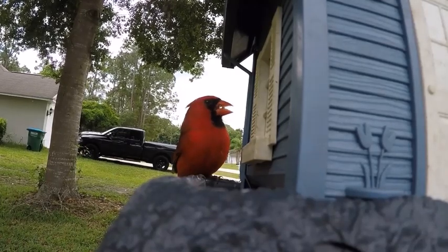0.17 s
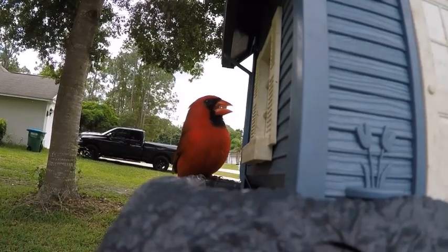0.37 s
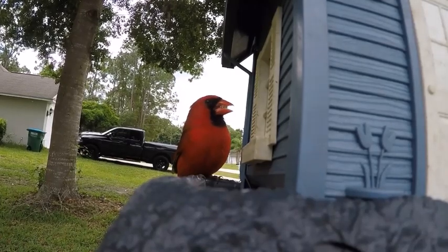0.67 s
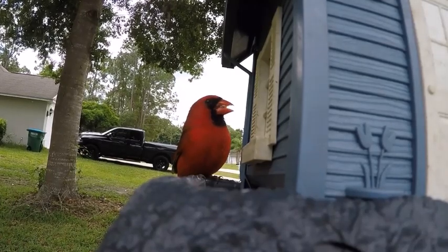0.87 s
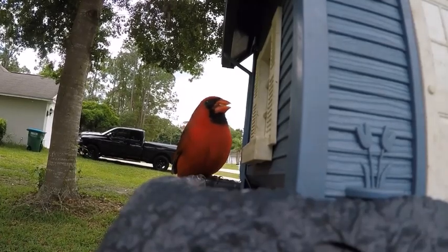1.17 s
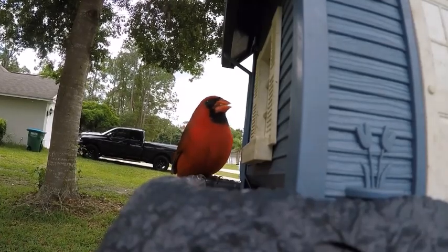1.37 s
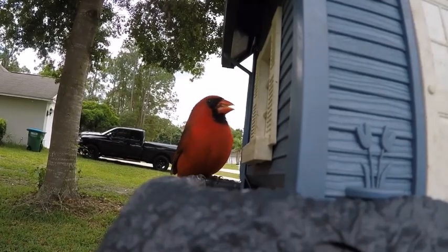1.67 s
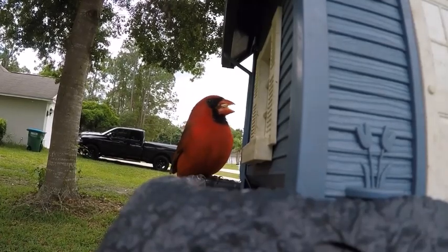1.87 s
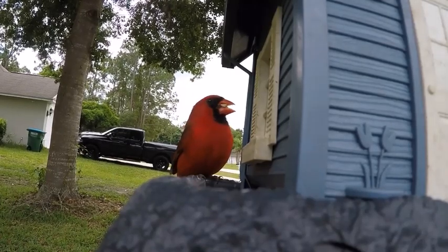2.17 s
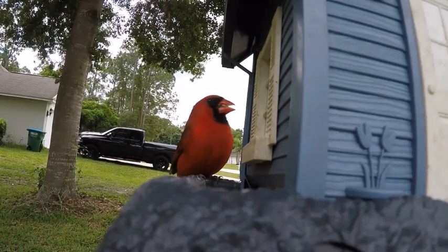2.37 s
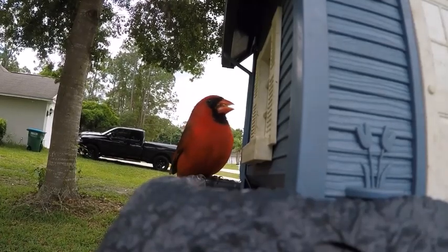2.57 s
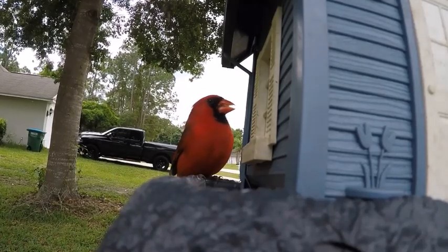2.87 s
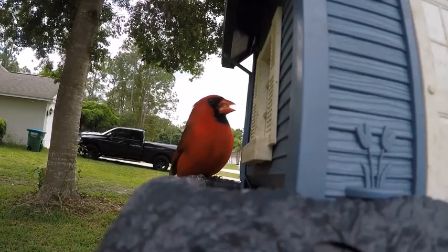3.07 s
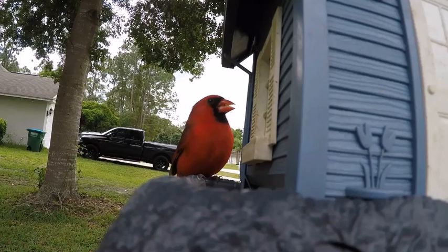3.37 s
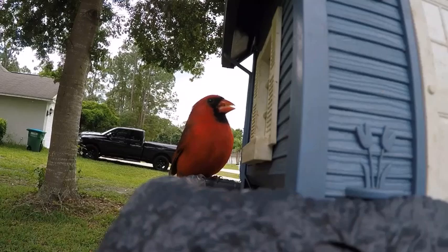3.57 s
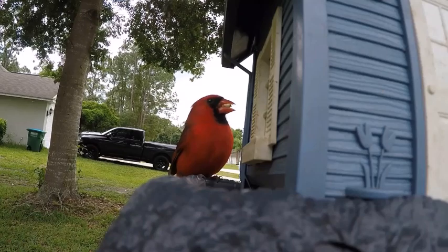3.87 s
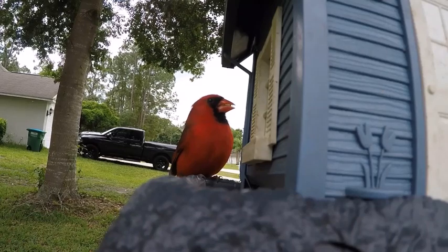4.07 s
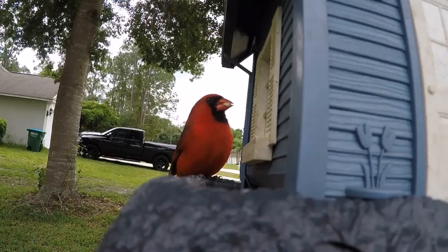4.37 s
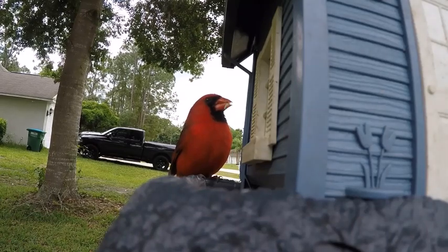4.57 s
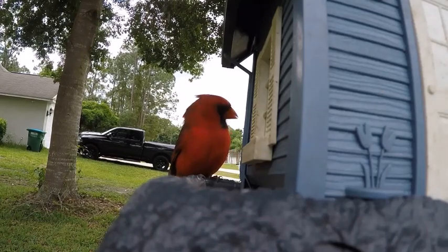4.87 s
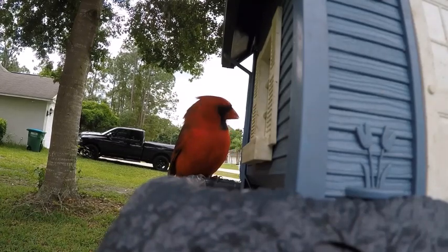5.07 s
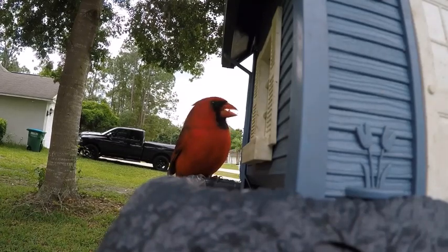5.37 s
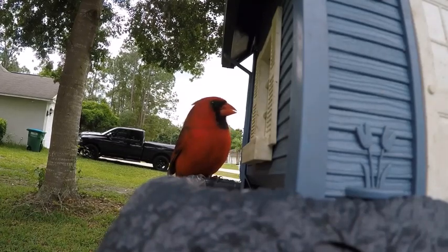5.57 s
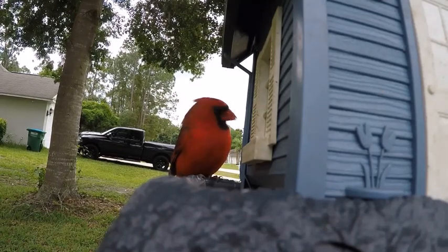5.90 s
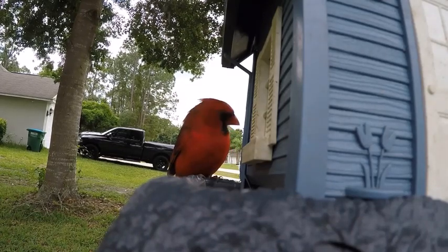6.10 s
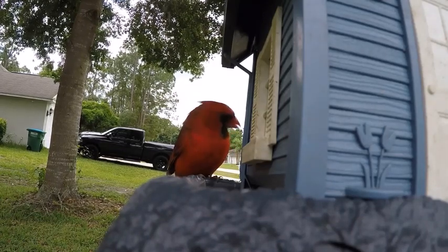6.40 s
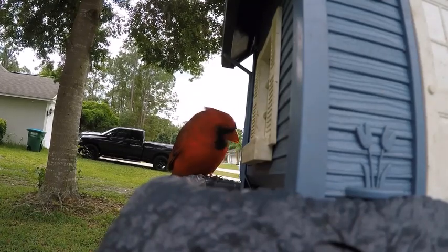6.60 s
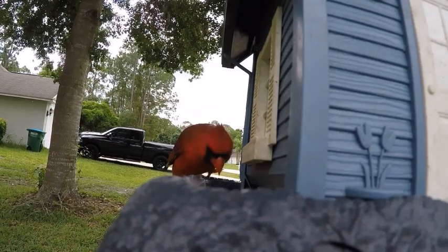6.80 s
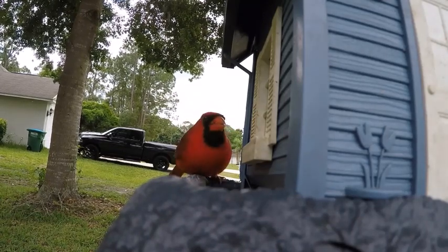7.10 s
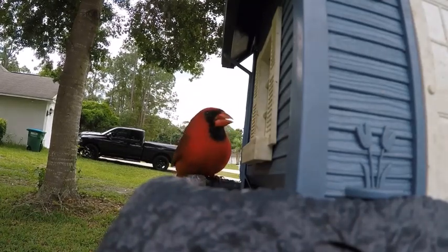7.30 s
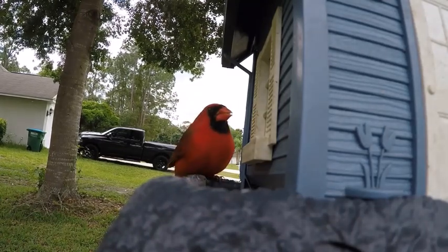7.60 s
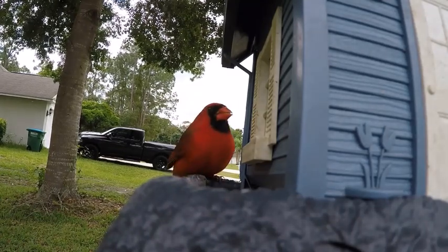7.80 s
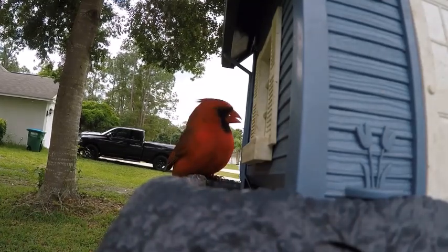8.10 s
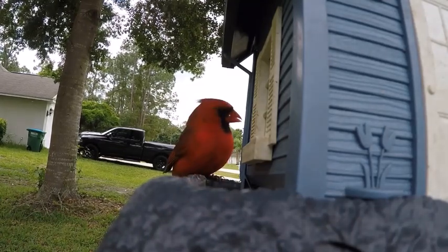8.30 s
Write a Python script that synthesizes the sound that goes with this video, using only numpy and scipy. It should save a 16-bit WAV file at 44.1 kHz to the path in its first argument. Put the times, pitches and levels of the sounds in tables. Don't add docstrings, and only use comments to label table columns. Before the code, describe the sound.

Deep wind buffets thump a small outdoor microphone while distant birds whistle in echoing runs and a seed cracks sharply close by.

```python
import sys
import numpy as np
from scipy import signal
from scipy.fft import rfft, irfft
from scipy.io import wavfile
from scipy.ndimage import uniform_filter1d

SR = 44100
rng = np.random.default_rng(int(sys.argv[2]) if len(sys.argv) > 2 else 0)


def master(y):
    cut = np.clip(np.atleast_2d(y).T, -1, 1)
    pcm = np.round(cut * 32767)
    wavfile.write(sys.argv[1], SR, pcm.astype(np.int16))


def ratio(d):
    e = np.asarray(d, float) / 20
    return 10 ** e


N = 372644


def coloured(points):
    hz, db = np.transpose(points)
    bins = np.maximum(np.fft.rfftfreq(N, 1 / SR), 1)
    gain = ratio(np.interp(np.log(bins), np.log(hz), db, -120, -120))
    noise = irfft(rfft(rng.standard_normal(N)) * gain, N)
    return noise / noise.std()


def walk(rate_hz, size=N):
    hold = int(SR / rate_hz)
    steps = np.repeat(rng.standard_normal(size // hold + 1), hold)
    return 1.49 * uniform_filter1d(uniform_filter1d(steps, hold), hold)[:size]


def add(out, sound, at_s):
    start = int(round(at_s * SR))
    sound = sound[max(-start, 0):max(N - start, 0)]
    first = max(start, 0)
    out[first:first + len(sound)] += sound


# frequency in Hz, level in dB per Hz.
BUFFET_SPECTRUM = [(9, -15), (16, 0.5), (27, 3), (40, -1), (60, -9), (90, -22.5), (130, -44)]
# frequency in Hz, level in dB per Hz.
FLUTTER_SPECTRUM = [(45, -37), (70, 3.5), (110, -1.5), (160, -11), (240, -22), (400, -34.5)]
# time in seconds, buffet level in dB, flutter level in dB.
BREEZE = [(0, -35, -40), (.45, -37, -37), (.9, -41.5, -42.5), (1.2, -49.5, -47), (1.7, -44.5, -44.5),
          (2.15, -52, -50.5), (2.5, -41.5, -47), (3, -40.5, -45.5), (3.7, -38.5, -44.5), (4.2, -40, -44),
          (4.9, -43, -46.5), (5.5, -48, -49), (6, -36, -44.5), (6.6, -46.5, -48.5), (7.2, -43.5, -49.5),
          (7.7, -46, -47), (8.45, -36, -47)]
# time of the peak in seconds, peak in dB, half length in seconds.
GUSTS = [(-0.008, -17, 0.11), (0.131, -24, 0.037), (0.31, -24, 0.048), (0.71, -34.5, 0.069),
         (0.894, -35, 0.075), (2.291, -35, .05), (2.523, -42.5, 0.063), (2.71, -43.5, 0.055),
         (3.133, -39, 0.13), (3.457, -35, 0.092), (3.588, -32, 0.041), (3.709, -25.5, 0.031),
         (3.774, -19, 0.06), (3.947, -27, 0.08), (4.26, -32, 0.06), (4.417, -37, 0.061),
         (4.82, -37.5, 0.042), (4.996, -26, 0.066), (5.28, -25.5, 0.085), (5.422, -24, 0.046),
         (5.522, -20.5, 0.1), (6.21, -32.5, 0.1), (6.76, -29, .1), (7.068, -33.5, 0.15), (7.352, -30, .06),
         (7.634, -23.5, 0.13), (7.865, -30, 0.065), (7.98, -32.5, .04), (8.132, -26.5, 0.075),
         (8.255, -27, 0.055)]


def wind():
    fall_db, gust_flutter_db = 17, -22
    t = np.arange(N) / SR
    s, buffet_db, flutter_db = np.transpose(BREEZE)
    gust = sum(ratio(db - fall_db * np.abs((t - at) / half) ** 1.14) for at, db, half in GUSTS)
    buffet = coloured(BUFFET_SPECTRUM)
    buffet /= uniform_filter1d(buffet ** 2, size=2600) ** 0.37
    buffet *= np.clip(.3 + t / .015, 0, 1)
    buffet_level = ratio(np.interp(t, s, buffet_db)) + gust
    flutter_level = ratio(np.interp(t, s, flutter_db)) + ratio(gust_flutter_db) * gust
    return buffet_level * buffet / buffet.std() + flutter_level * coloured(FLUTTER_SPECTRUM)


def yard(hz, t60_s, wash_db):
    leaf_t60_s, leaf_db = .11, -3
    wall_s, wall_db = .102, -13
    t = np.arange(SR) / SR
    blur = rng.standard_normal(SR) * 1000 ** (-t / leaf_t60_s)
    blur /= np.linalg.norm(blur)
    decay = 1000 ** (-t / (t60_s * 2500 / hz))
    lumps = ratio(1.9 * walk(60, size=SR))
    wash = rng.standard_normal(SR) * lumps * decay * np.clip(t / 0.017, 0, 1)
    path = ratio(leaf_db) * blur + ratio(wash_db) * wash / np.linalg.norm(wash)
    add(path, ratio(wall_db) * blur[:SR // 20], wall_s)
    path[0] = 1
    return path


def bird(calls, shape, t60_s, wash_db, flicker_db=2.0):
    out = np.zeros(N)
    for s, percent, *peaks in calls:
        for note, peak_db in zip(shape, peaks):
            at, hz, note_db = np.transpose(note)
            t = np.arange(at[0], at[-1], 1 / SR)
            glide = uniform_filter1d(np.interp(t, at, hz), size=90, mode="nearest")
            glide *= 1 + percent / 100
            flicker = walk(130, size=len(t))
            flicker -= flicker.mean()
            level = ratio(peak_db + np.interp(t, at, note_db) + flicker_db * flicker)
            tone = level * np.sin(2 * np.pi * np.cumsum(glide) / SR)
            heard = signal.fftconvolve(tone, yard(glide.mean(), t60_s, wash_db))
            add(out, heard, s + at[0])
    return out


# seconds from the start of the call, pitch in Hz, level in dB.
ROLL_NOTES = [
    [(-.006, 5300, -34), (.008, 4850, -15), (.03, 4350, -1), (.045, 4100, -5), (.057, 3870, -3),
     (.066, 3500, -8), (.074, 3150, -9), (.09, 2780, -18), (.094, 2750, -30)],
    [(.096, 2750, -22), (.108, 2950, -10), (.119, 3150, 0), (.126, 3200, -25)],
    [(.128, 3750, -22), (.14, 4000, -9), (.149, 4450, 0), (.157, 4900, -4), (.162, 5150, -25)],
    [(.2, 2420, -22), (.214, 2540, -3), (.232, 2620, 0), (.248, 2590, -4), (.254, 2450, -10),
     (.264, 2260, -13), (.27, 2150, -30)],
]
# start in seconds, then peaks in dB of the fall, hook, rise and low note.
ROLL_CALLS = [
    (-.17, -46, -45.5, -49, -58.5),
    (.176, -46, -51, -45.5, -55.5),
    (0.525, -49, -52.5, -46, -56),
    (5.677, -55, -53, -52.5, -57.5),
    (6.013, -51, -48.5, -51.5, -54),
    (6.344, -50.5, -47.5, -51.5, -56),
    (6.68, -48, -46.5, -51, -53.5),
    (7.031, -50, -49, -48.5, -52.5),
]


def rolling_songs():
    calls = [(s, 0, *peaks) for s, *peaks in ROLL_CALLS]
    return bird(calls, ROLL_NOTES, t60_s=1.2, wash_db=-2.5, flicker_db=3.5)


# seconds from the start of the call, pitch in Hz, level in dB.
OPENER_NOTE = [
    [(.012, 2640, -24), (.024, 2720, 0.5), (.045, 2860, 1), (.065, 2926, 1), (.095, 2910, 4.5),
     (.11, 2800, -21)],
]
# start in seconds, pitch shift in percent, peak in dB.
OPENER_CALLS = [
    (1.238, 0.19, -56),
]
# seconds from the start of the call, pitch in Hz, level in dB.
ARCH_NOTE = [
    [(-.006, 2380, -14), (.004, 2480, -4), (.022, 2720, -2), (.042, 2890, -2), (.065, 2945, 0),
     (.092, 2950, 2), (.106, 2800, -1), (.12, 2520, -3), (.126, 2420, -20)],
]
# start in seconds, pitch shift in percent, peak in dB.
ARCH_CALLS = [
    (1.484, -0.69, -55.5),
    (1.738, 0.12, -55.5),
    (1.996, 0.29, -53.5),
    (2.256, 0.065, -53.5),
    (4.645, -0.63, -57),
    (4.895, -0.57, -54),
    (7.504, .6, -55.5),
    (7.755, 0.0092, -55),
    (8.001, 0.11, -55.5),
    (8.257, 0.25, -53.5),
]


def arched_whistles():
    opener = bird(OPENER_CALLS, OPENER_NOTE, t60_s=1.31, wash_db=-0.18)
    return opener + bird(ARCH_CALLS, ARCH_NOTE, t60_s=1.31, wash_db=-0.18)


# seconds from the start of the call, pitch in Hz, level in dB.
CHIP_NOTE = [
    [(-.001, 5800, -16), (.002, 6500, -3), (.005, 7250, -3), (.009, 7600, 0), (.014, 7750, -4),
     (.019, 7780, -28)],
]
# start in seconds, pitch shift in percent, peak in dB.
CHIP_CALLS = [
    (1.414, 1.5, -50),
    (3.222, 2, -48.5),
    (4.879, -1.8, -53),
    (6.916, -3, -53),
    (8.226, -1.5, -52.5),
]


def chips():
    return bird(CHIP_CALLS, CHIP_NOTE, t60_s=0.88, wash_db=0.73)


def ring(modes, pitch):
    t = pitch * np.arange(SR // 10) / SR
    sound = sum(ratio(db) * 1000 ** (-t / t60) * np.sin(2 * np.pi * hz * t) for hz, db, t60 in modes)
    return sound / np.abs(sound).max()


# frequency in Hz, level in dB, T60 in seconds.
HUSK_MODES = [(1900, -6, .003), (2900, -5, .003), (4100, -6, .003), (4900, 1, .008), (6200, -2, .003),
              (8500, -4, .003)]
# frequency in Hz, level in dB, T60 in seconds.
SHELL_MODES = [(11300, -4, .003), (12300, -2, .003), (13100, 0, .004), (14100, -13, .003)]
# start in seconds, shell level in dB, husk level in dB,
# after-crackle level in dB, husk pitch as a factor.
CRACKS = [
    (1.4044, -52, -44.5, -8, 1.2),
    (2.2846, -44.5, -49, -6, 1.2),
    (3.5857, -25, -31.5, -17, 1),
    (4.0587, -77, -52, -3, 1.3),
    (6.796, -74, -44, -12, .63),
    (6.872, -82, -42, -14, .1),
]


def cracks():
    out = np.zeros(N)
    t = np.arange(SR // 40) / SR
    for s, shell_db, husk_db, tear_db, pitch in CRACKS:
        fibres = rng.standard_normal(len(t)) * (rng.random(len(t)) < .15)
        push = fibres * np.exp(-t / 0.0067) * (t > .0035) * ratio(tear_db)
        push[[0, 14]] = .3, 1
        body = ratio(shell_db) * ring(SHELL_MODES, 0.98) + ratio(husk_db) * ring(HUSK_MODES, pitch)
        add(out, signal.fftconvolve(push, body), s)
    return out


# time in seconds, firing rate in Hz, level in dB.
ENGINE = [(1.801, 36, -64), (2.0, 36, -49.5), (2.3, 34.24, -46), (2.701, 32.35, -46.5), (3.0, 31.8, -51.5),
          (3.2, 31.9, -73)]
# multiple of the firing rate, level in dB.
ENGINE_ORDERS = [(3, -0.5), (4, -3), (5, -14)]


def engine():
    s, hz, db = np.transpose(ENGINE)
    t = np.arange(N) / SR
    turn = 2 * np.pi * np.cumsum(np.interp(t, s, hz)) / SR
    orders = sum(ratio(order_db + 2.26 * walk(4.75)) * np.sin(k * turn) for k, order_db in ENGINE_ORDERS)
    return ratio(np.interp(t, s, db, -120, -120)) * orders


# frequency in Hz, level in dB per Hz.
TRAFFIC_SPECTRUM = [(100, -21), (170, -6), (303, -6), (429, -2.5), (506, -3.5), (546, -7.5), (595, -9.5),
                    (701, -12.5), (1220, -21), (2300, -26), (2990, -50), (5060, -120)]
# frequency in Hz, level in dB per Hz.
HISS_SPECTRUM = [(1180, -33), (2000, -7), (2410, -1.5), (2640, 3), (3130, -1), (4210, -1.5), (4940, -1),
                 (5570, -4), (6590, -6), (7170, -8), (8640, -9.5), (10200, -13), (13100, -10),
                 (14100, -9.5), (15100, -18)]
# frequency in Hz, width in Hz, level in dB rms.
HISS_PEAKS = [(9580, 150, -88.5), (14440, 230, -81.5)]
# frequency in Hz, level in dB rms.
WHINE = [(8631, -92.5), (14086, -87)]
# time in seconds, gain in dB.
DRIFT = [(0, 1.65), (1.4, 1.6), (2.8, 0.4), (4.2, -0.1), (5.6, 0.8), (7, 0.6), (8.45, 0.3)]


def background():
    t = np.arange(N) / SR
    traffic = ratio(-57 + 0.74 * walk(2.6)) * coloured(TRAFFIC_SPECTRUM)
    hiss = ratio(-66.5 + 0.36 * walk(3)) * coloured(HISS_SPECTRUM)
    for hz, width, db in HISS_PEAKS:
        hiss += ratio(db) * coloured([(hz - width, -14), (hz, 0), (hz + width, -14)])
    whine = sum(np.sqrt(2) * ratio(db) * np.sin(2 * np.pi * hz * t) for hz, db in WHINE)
    return (traffic + hiss) * ratio(np.interp(t, *np.transpose(DRIFT))) + whine


def scene():
    birds = rolling_songs() + arched_whistles() + chips()
    return (wind() + birds + cracks() + engine() + background())[None]


# middle of the first frame in seconds, length in frames,
# frequency in Hz
STARVED = [(.128, 1, 1200), (.597, 1, 600), (.661, 1, 600), (.853, 1, 1200), (1.152, 3, 1200),
           (1.856, 1, 600), (2.027, 1, 1200), (2.859, 2, 1200), (2.965, 1, 5500), (3.093, 1, 5500),
           (3.712, 1, 5500), (4.053, 1, 1200), (4.117, 1, 5500), (4.309, 1, 1200), (5.312, 2, 1200),
           (5.76, 1, 1200), (5.973, 1, 3500), (6.123, 1, 1200), (6.229, 1, 5500), (6.379, 1, 1200),
           (6.443, 1, 1200), (7.552, 1, 1200), (7.701, 1, 2000), (7.872, 1, 1200), (7.979, 1, 5500),
           (8.064, 1, 1200), (8.192, 1, 1200), (8.299, 1, 1200), (8.363, 1, 1200)]
THINNED = [.469, .939, .981, 1.429, 1.941, 3.755, 6.08, 6.101, 6.293, 6.571, 6.635, 7.68, 7.787, 8.0, 8.149,
           8.384]


def starve(x):
    frame = 1024 * SR / 48000
    starved_db, thinned_db, thinned_hz = 5, 0, 4500
    out, hop, start = x.copy(), int(frame), 0
    rise = np.cumsum(np.kaiser(hop, 4 * np.pi))
    window = np.sqrt(np.r_[rise, rise[::-1]] / rise[-1])
    line = np.arange(hop) + .5
    hz = line * SR / 2 / hop
    phase = np.pi / hop * np.outer(line, np.arange(2 * hop) + .5 + hop / 2)
    basis = window * np.sqrt(2 / hop) * np.cos(phase)
    every = basis @ np.lib.stride_tricks.sliding_window_view(x, 2 * hop)[::hop].T
    usual = uniform_filter1d(np.median(np.abs(every), axis=1), size=15)
    usual *= ratio(10.5 + 1.8 * np.log2(hz / 4000))
    moments = [(s, thinned_hz, thinned_db) for s in THINNED]
    for s, frames, low_hz in STARVED:
        moments += [(s + k * frame / SR, low_hz, starved_db) for k in range(frames)]
    for s, low_hz, step_db in sorted(moments):
        place = int(round(s * SR / frame) * frame) - hop
        start = start + hop if place - start < hop + 2 else place
        lines = basis @ x[start:start + 2 * hop]
        step = usual * ratio(step_db - 5 * (hz < low_hz))
        rounded = np.sign(lines) * step * np.floor(np.abs(lines) / step + .4)
        error = (rounded - lines) * (hz > 600)
        out[start:start + 2 * hop] += .86 * error @ basis
    return out


def band_limit(x):
    return signal.sosfilt(signal.butter(12, 15250, fs=SR, output="sos"), x)


def record(dry):
    top_cut = signal.ellip(6, .2, 30, 15150, fs=SR, output="sos")
    mix = starve(signal.sosfiltfilt(top_cut, dry[0]))[None]
    return band_limit(mix)


dry = scene()
out = record(dry)
master(out)
```